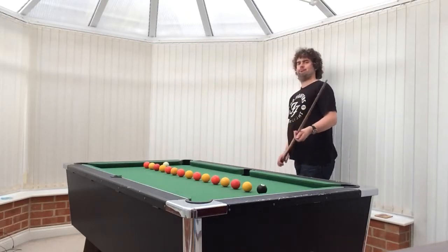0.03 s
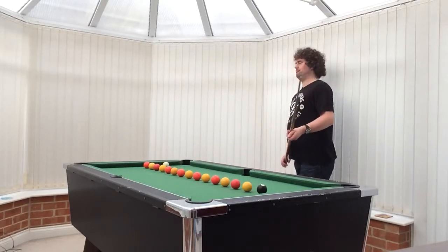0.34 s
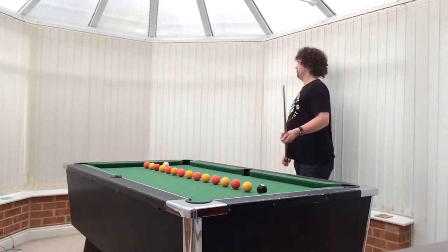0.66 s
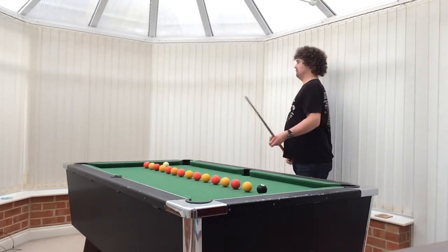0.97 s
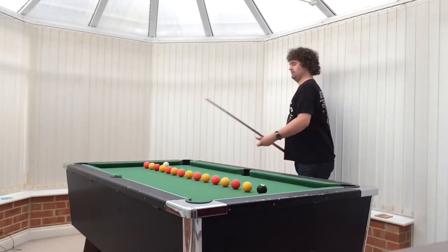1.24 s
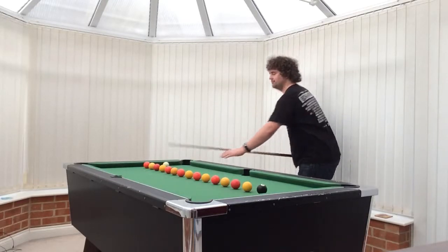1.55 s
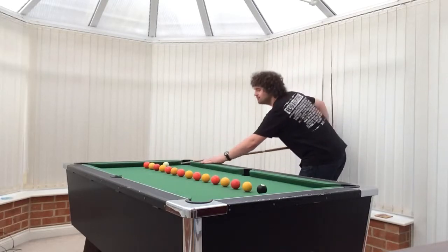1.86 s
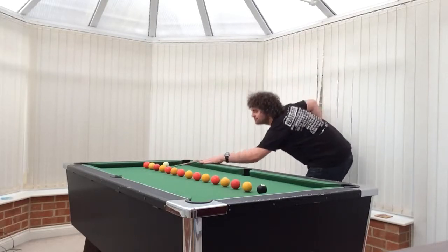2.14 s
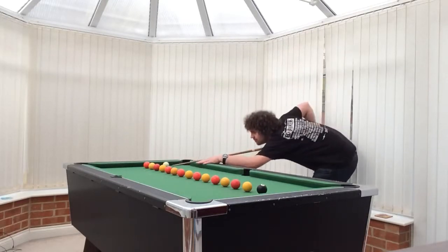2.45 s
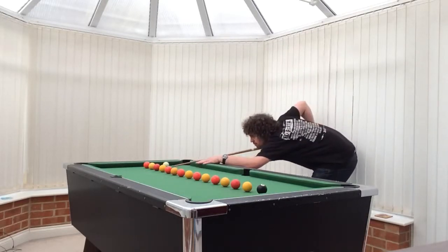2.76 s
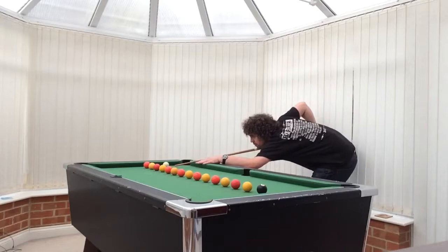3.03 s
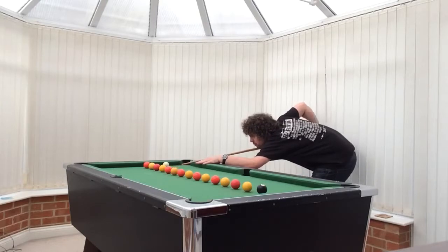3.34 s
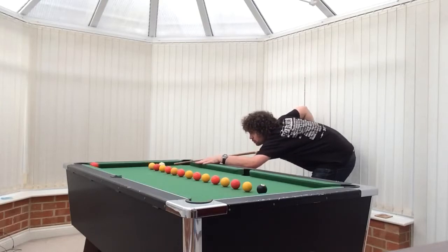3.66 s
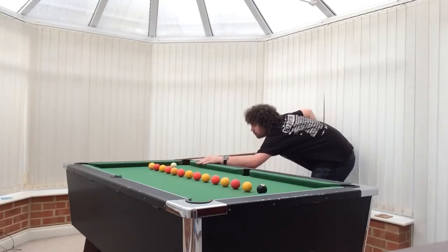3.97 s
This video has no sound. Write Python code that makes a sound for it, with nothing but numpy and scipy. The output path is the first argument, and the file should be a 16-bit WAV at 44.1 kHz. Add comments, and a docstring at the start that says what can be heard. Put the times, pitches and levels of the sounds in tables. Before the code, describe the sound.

A pool shot in a small, hard-walled room with short echoes. For the first three seconds there is only quiet room air, faint shuffles, clothing rustle, soft bumps and small cue ticks. At 3.5 seconds the cue snaps against a ball, which at once cracks sharply into another. A low roll follows, and from 3.8 to 4 seconds the ball drops into a pocket with loud knocks and hollow thuds.

```python
"""A pool shot, heard from one microphone in a small, hard-walled conservatory. The cue tip snaps against
the white, which cracks into a second ball. That ball rumbles over the slate, brushes the jaw of a pocket
and drops in, knocking on the liner and thudding through the hollow cabinet. Before the shot the player
settles over the table with a faint rustle and soft bumps. Close walls and a glass roof throw the hard
contacts back to the microphone, over quiet room air."""
import sys
import numpy as np
from scipy import signal
from scipy.fft import rfft, irfft
from scipy.io import wavfile
from scipy.ndimage import uniform_filter1d

SR = 44100
rng = np.random.default_rng(int(sys.argv[2]) if len(sys.argv) > 2 else 0)


def materialize(psi):
    """Save the field psi as 16-bit PCM at rate SR to the path in sys.argv[1].

    A 1-D psi becomes a single channel; in a 2-D psi each row is a channel.
    """
    bounded = np.clip(np.atleast_2d(psi).T, -1, 1)
    quanta = np.round(bounded * 32767).astype(np.int16)
    wavfile.write(sys.argv[1], SR, quanta)


N = 176400
T = np.arange(N) / SR


def from_db(db):
    """Decibels to gain."""
    return 10 ** (np.asarray(db) / 20)


def at_hz(points, hz):
    """Read a table on a log-frequency axis."""
    f, value = np.transpose(points)
    return np.interp(np.log(np.maximum(hz, 1)), np.log(f), value)


def convolve(x, response):
    """Pass a sound through an impulse response."""
    return signal.fftconvolve(x, response)[:N]


def noise(colour):
    """Steady noise of the given spectrum, rms 1."""
    gain = from_db(at_hz(colour, np.fft.rfftfreq(N, 1 / SR)))
    x = irfft(rfft(rng.standard_normal(N)) * gain)
    return x / x.std()


def swells(rows, column=2):
    """A smooth rise and fall for each row (centre/s, length/s, ...), its level/dB in the given column."""
    return sum(from_db(row[column]) * np.exp(-4 * ((T - row[0]) / row[1]) ** 2) for row in rows)


def impulses(rows):
    """One impulse for each (t/s, level/dB)."""
    out = np.zeros(N)
    for s, db in rows:
        out[min(int(s * SR), N - 1)] += from_db(db)
    return out


def contacts(rows):
    """One low-passed impulse for each (t/s, level/dB, f/Hz): the softer the contact, the duller."""
    out = np.zeros(N)
    for s, db, hz in rows:
        lowpass = signal.butter(2, min(hz, .45 * SR), fs=SR)
        out += signal.lfilter(*lowpass, impulses([(s, db)]) + 1e-18)
    return out


def click(colour, size=8192):
    """The shortest causal click that has the given spectrum."""
    gain = from_db(at_hz(colour, np.fft.rfftfreq(size, 1 / SR)))
    cepstrum = irfft(np.log(gain))
    cepstrum[1:size // 2] *= 2  # fold to minimum phase
    cepstrum[size // 2 + 1:] = 0
    return irfft(np.exp(rfft(cepstrum)))


def ringing(modes):
    """The sum of a body's dying modes after a unit blow."""
    t = T[:SR]
    ring = sum(from_db(db - 60 * t / t60) * np.cos(2 * np.pi * hz * t) for hz, db, t60 in modes)
    ring[0] *= .5
    return ring


# room tone at the microphone: (f/Hz, level/dB)
AIR_SPECTRUM = [(15, -29), (25, -10.5), (77, -2.5), (126, -9), (305, -15), (349, -19), (433, -17.5),
                (826, -22.5), (1410, -27), (1750, -29), (2630, -33.5), (7700, -36.5), (15500, -46.5)]
def room_air(level_db=-64):
    """The quiet, low, steady air of the conservatory."""
    return from_db(level_db) * noise(AIR_SPECTRUM)


def dense_reflections(size, even_s=.003):
    """Crowded reflections: random, but even in level and colour."""
    x = rng.standard_normal(size)
    for _ in range(2):
        _, _, bins = signal.stft(x, nperseg=512)
        power = uniform_filter1d(abs(bins) ** 2, size=3, axis=0)
        power = uniform_filter1d(power, size=3, axis=1)
        x = signal.istft(bins / np.sqrt(power))[1][:size]
    return x / np.sqrt(uniform_filter1d(x ** 2, size=int(even_s * SR)))


# early echoes off the close walls and glass roof: (delay t/s, level/dB)
WALL_ECHOES = [(.0011, -12), (.0056, -20.5), (.0076, -12.5), (.0088, -13.5), (0.0128, -28), (0.0164, -16),
               (.0283, -19)]
# decay of the room's tail: (f/Hz, t60/s)
ROOM_DECAY = [(100, 0.83), (400, .34), (900, 0.26), (1900, 0.3), (3500, 0.24), (6000, 0.18), (12000, 0.14)]
# the glazed walls ring on: (f/Hz, level/dB, t60/s)
GLASS_MODES = [(1568, -58, .35), (1600, -59, .35), (1773, -57, .38), (1982, -53, .4), (2184, -57, .35),
               (2231, -56, .35), (2322, -49, .32), (2356, -54, .32), (2568, -53, .32), (2865, -55, .3),
               (3279, -54, .28), (3917, -55, .28)]
def conservatory(x, echo_db=0, build_s=.0017, size=32768):
    """What the room returns of x: hard echoes, then a dense, ringing tail whose treble dies first."""
    t, hz = T[:size], np.fft.rfftfreq(size, 1 / SR)
    spectrum = rfft(dense_reflections(size))
    centres = [f for f, _ in ROOM_DECAY]
    tail = 0
    for share, (_, t60) in zip(np.eye(len(centres)), ROOM_DECAY):
        band = irfft(spectrum * at_hz(list(zip(centres, share)), hz))
        tail = tail + band * from_db(-60 * t / t60)
    build = 1 - np.exp(-(t / build_s) ** 2)
    tail = from_db(-3) * tail / np.linalg.norm(tail * build)
    glass = from_db(-5.5) * ringing(GLASS_MODES)[:size]
    echoes = from_db(echo_db) * impulses(WALL_ECHOES)[:size]
    return convolve(x, build * (tail + glass) + echoes)


# weight shifting on floor and table: (t/s, length/s, bump level/dB, floor boom level/dB)
WEIGHT_SHIFTS = [(0.153, 0.31, -73, -59.5), (2.055, 0.16, -63, -58), (2.225, 0.091, -46, -65),
                 (2.322, 0.092, -52, -55), (2.456, 0.13, -54.5, -54), (2.778, 0.066, -45, -66),
                 (2.843, 0.052, -56.5, -79)]
# shoes on the floor: (t/s, length/s, level/dB)
FOOT_SHUFFLES = [(0.09, .14, -71), (0.752, 0.032, -70.5), (1.195, 0.11, -77)]
# spectra of bump, floor boom and shuffle: (f/Hz, level/dB)
BUMP_SPECTRUM = [(25, -27), (60, -18), (110, 3), (170, -3), (250, -21.5), (550, -26), (1200, -41),
                 (8000, -63.5)]
FLOOR_SPECTRUM = [(20, -12), (40, -20), (65, 15), (100, -10), (300, -48.5)]
SHUFFLE_SPECTRUM = [(100, -3), (300, 1), (550, 0), (900, 4), (1200, -15), (4000, -40)]
def player_stance():
    """At the table the player shuffles his feet and leans in with dull bumps."""
    bumps = swells(WEIGHT_SHIFTS) * noise(BUMP_SPECTRUM)
    boom = swells(WEIGHT_SHIFTS, column=3) * noise(FLOOR_SPECTRUM)
    feet = swells(FOOT_SHUFFLES) * noise(SHUFFLE_SPECTRUM)
    return bumps + boom + feet


# sliding movements, faint at the microphone: (t/s, length/s, rub level/dB, hiss level/dB)
RUSTLES = [(.9, .45, -80.5, -95), (1.518, 0.24, -71, -100), (1.73, .32, -72.5, -71),
           (1.924, 0.24, -64.5, -80.5), (2.053, 0.11, -68.5, -86), (2.176, 0.13, -68, -76),
           (2.286, 0.071, -73, -86), (2.483, 0.34, -66, -71.5), (3.2, 0.13, -67.5, -77)]
# spectra of rub and hiss: (f/Hz, level/dB)
RUB_SPECTRUM = [(150, -5.5), (500, 2.5), (1100, -5.5), (1550, -1.5), (2100, -0.5), (2700, -9),
                (3400, -11.5), (5000, -21), (15000, -42)]
HISS_SPECTRUM = [(1000, -1), (3500, -5), (7500, 2.5), (9000, -6.5), (15000, -5)]
def player_rustle(grain_db=1.5, grain_hz=35):
    """Clothes rub unevenly and the cue slides over the hand."""
    grain = from_db(grain_db * noise([(grain_hz, 0), (grain_hz * 10, -60)]))
    rub = grain * swells(RUSTLES) * noise(RUB_SPECTRUM)
    hiss = swells(RUSTLES, column=3) * noise(HISS_SPECTRUM)
    return rub + hiss


# ticks of cue and clothing: (t/s, level/dB, dull above f/Hz)
HANDLING_TICKS = [(0.226, -27.5, 2470), (1.993, -24, 15800), (2.165, -21, 5000), (2.695, -24.5, 7900)]
# their spectrum: (f/Hz, level/dB)
TICK_SPECTRUM = [(200, -7), (1400, -3), (2150, -3.5), (3000, -10), (7500, -11.5), (10000, -15),
                 (15000, -12)]
def cue_handling(direct_db=-12):
    """Small taps as the cue is handled, reaching the microphone mostly by way of the room."""
    taps = convolve(contacts(HANDLING_TICKS), click(TICK_SPECTRUM))
    return from_db(direct_db) * taps + conservatory(taps)


# the roll, on the slate and then down in the return channel: (t/s, level/dB)
ROLL_ENVELOPE = [(3.40, -75), (3.49, -50), (3.515, -27), (3.57, -28), (3.66, -36), (3.78, -41.5),
                 (3.84, -26), (3.92, -56), (3.97, -29), (4.0, -23)]
# its spectrum: (f/Hz, level/dB)
ROLL_SPECTRUM = [(25, -60), (55, -10), (88, -7), (108, 1), (160, 2.5), (200, -4), (260, -34), (500, -25),
                 (900, -41), (3000, -46.5), (12000, -68)]
def rolling_ball():
    """An even, low rumble under the moving ball."""
    rumble = noise(ROLL_SPECTRUM)
    rumble /= np.sqrt(uniform_filter1d(rumble ** 2, size=1800))  # level held steady over about 40 ms
    return rumble * from_db(np.interp(T, *np.transpose(ROLL_ENVELOPE)))


# the ball's weight lands inside the table: (t/s, level/dB, contact time/s)
LANDINGS = [(3.803, -20, 0.0011), (3.8145, -5.5, 0.0065), (3.8235, -7.5, 0.0044), (3.8577, -1.5, 0.0055),
            (3.8632, -4, 0.0093), (3.9302, -15, 0.0012), (3.9422, 0, 0.0038), (3.949, 6, 0.0041)]
# the hollow cabinet: (f/Hz, level/dB, t60/s)
HOLLOW_MODES = [(80, -44, 0.099), (124.7, -25.5, 0.25), (144, -16, 0.17), (163.4, -17, 0.21),
                (195, -45, 0.1), (231, -21.5, 0.28), (298, -17, 0.22), (347, -40, 0.15), (490, -16, 0.18),
                (503, -32, 0.24)]
def cabinet_thuds(room_db=-5):
    """Each landing is a short downward push that sets the cabinet ringing."""
    force = 0
    for s, db, contact_s in LANDINGS:
        push = np.exp(-np.pi * (2 * (T - s) / contact_s) ** 2)
        force = force - from_db(db) * push / push.sum()
    body = convolve(force, ringing(HOLLOW_MODES))
    return body + from_db(room_db) * conservatory(body)


# knocks at the pocket: (t/s, level/dB, dull above f/Hz, direct path offset/dB)
KNOCKS = [(3.7986, -23.5, 2470, -31), (3.8483, 1, 16400, 9), (3.8602, 0.5, 1610, -31),
          (3.9237, 7, 7450, -6), (3.9313, -9, 2050, 14), (3.9431, -5, 794, -4)]
# their spectrum: (f/Hz, level/dB)
KNOCK_SPECTRUM = [(50, -5), (110, 18), (180, 35), (300, 20.5), (500, 27.5), (800, 19.5), (1200, 16),
                  (1800, 18), (2500, 8.5), (3700, 8), (5000, 8), (7500, 2.5), (10000, 0.5), (15000, -4.5)]
# the liner rings briefly: (f/Hz, level/dB, t60/s)
POCKET_LINER_MODES = [(1001, -36, .2), (1308, -34, .2), (1696, -31, .2), (1850, -35, .15), (2868, -43, .2),
                      (3830, -42, .12)]
def pocket_knocks(direct_db=-18.5, ring_db=-2):
    """The ball knocks on jaw and liner, more or less hidden from the microphone by the rail."""
    knocks = contacts((s, db, hz) for s, db, hz, _ in KNOCKS)
    direct = contacts((s, db + offset_db + direct_db, hz) for s, db, hz, offset_db in KNOCKS)
    clack = convolve(direct + conservatory(knocks, echo_db=-6), click(KNOCK_SPECTRUM))
    liner = from_db(ring_db) * convolve(knocks, ringing(POCKET_LINER_MODES))
    return clack + liner


# tip on the white, a soft push and a double snap: (t/s, level/dB, dull above f/Hz)
TIP_CONTACTS = [(3.499, -9, 1490), (3.5008, -9.5, 13200), (3.5049, 2, 7900)]
# their spectrum: (f/Hz, level/dB)
TIP_SPECTRUM = [(50, -8), (130, 12.5), (270, 9), (560, 18.5), (750, 13.5), (1550, 20), (2400, 13.5),
                (4500, 8.5), (6800, 7), (9500, 0), (15000, 0)]
# the wooden shaft: (f/Hz, level/dB, t60/s)
SHAFT_MODES = [(574, -37.5, 0.14), (804, -37, 0.11), (1330, -35, 0.13), (1353, -50, .12), (1588, -43, .12),
               (2500, -46, 0.093), (3740, -40, .06), (6200, -30.5, 0.042), (6970, -33, .035),
               (7780, -31, 0.028)]
def cue_strike(direct_db=-11.5, ring_db=4.5):
    """The tip snaps against the white and the shaft rings."""
    force = contacts(TIP_CONTACTS)
    snap = convolve(force, click(TIP_SPECTRUM))
    shaft = from_db(ring_db) * convolve(force, ringing(SHAFT_MODES))
    return from_db(direct_db) * snap + conservatory(snap, echo_db=-4) + shaft


# ball on ball, out on the table: (t/s, level/dB)
COLLISIONS = [(3.5418, -1.5)]
# spectrum of the crack: (f/Hz, level/dB)
CRACK_SPECTRUM = [(100, 16.5), (750, 12), (1050, 16), (1500, 27.5), (2350, 29.5), (3200, 24), (4300, 18.5),
                  (5200, 9), (6300, -2.5), (8500, -14), (15000, -15)]
def ball_crack(direct_db=-12.5):
    """The white hits the second ball in one hard contact; the microphone gets more room than direct."""
    crack = convolve(impulses(COLLISIONS), click(CRACK_SPECTRUM))
    return from_db(direct_db) * crack + conservatory(crack, echo_db=.5, build_s=.0046)


def scene():
    """Room air, the player, the roll and drop, and the shot itself, in mono."""
    background = room_air() + player_stance() + player_rustle() + cue_handling()
    roll_and_drop = rolling_ball() + cabinet_thuds() + pocket_knocks()
    shot = cue_strike() + ball_crack()
    return (background + roll_and_drop + shot)[None]


def record(dry):
    """After the microphone the highest peaks are rounded and the top treble is cut."""
    ceiling, stopband_hz = .95, 16700
    limited = dry / (1 + (dry / ceiling) ** 6) ** (1 / 6)
    return signal.sosfilt(signal.cheby2(16, 70, stopband_hz, fs=SR, output="sos"), limited)


dry = scene()
out = record(dry)
materialize(out)
```